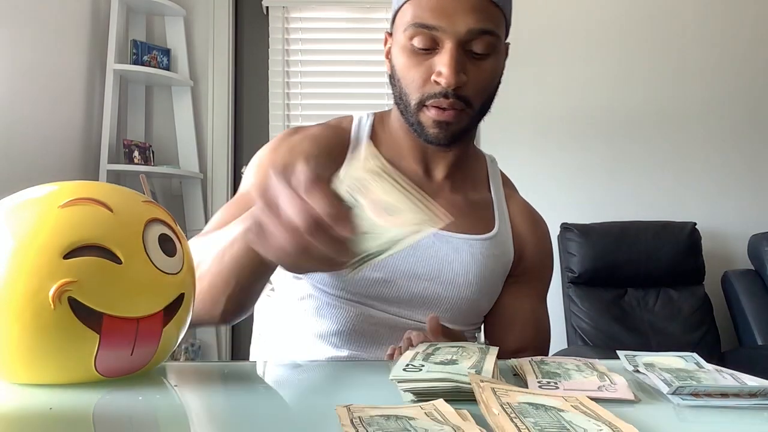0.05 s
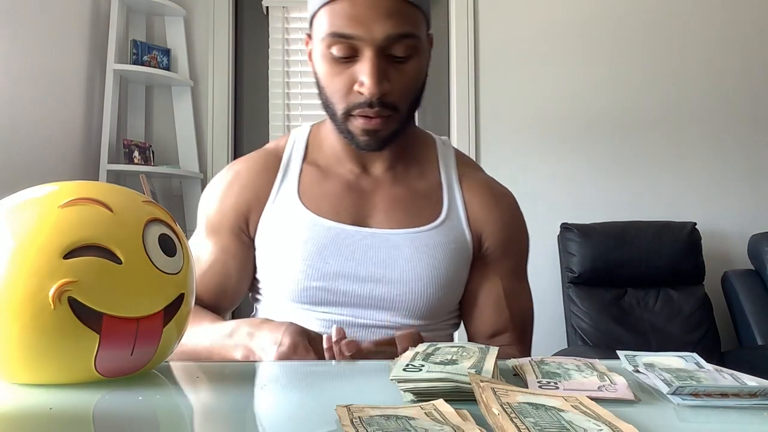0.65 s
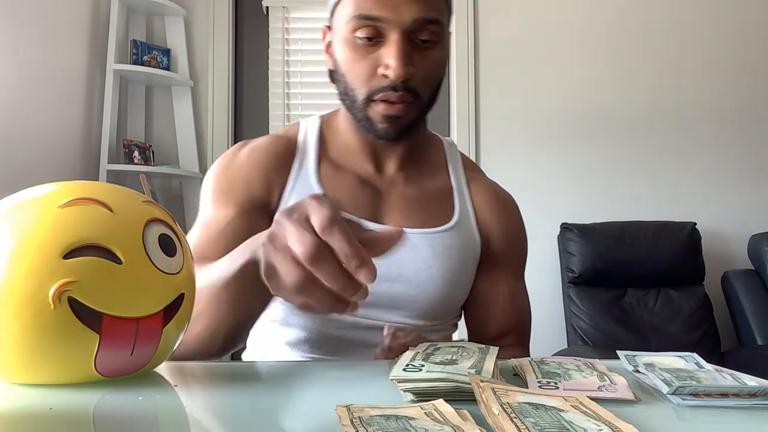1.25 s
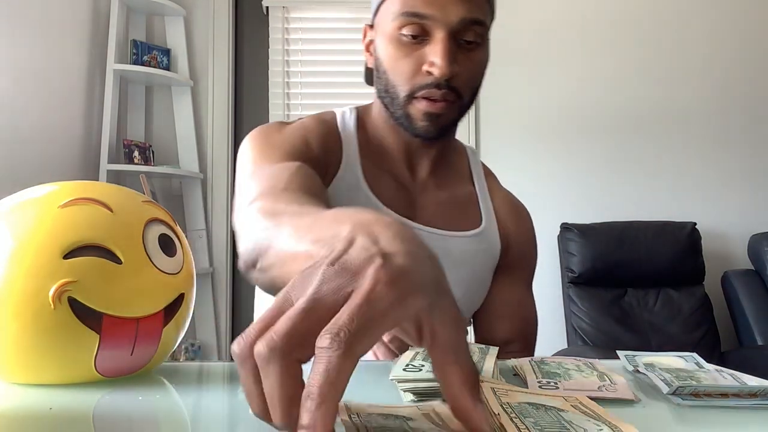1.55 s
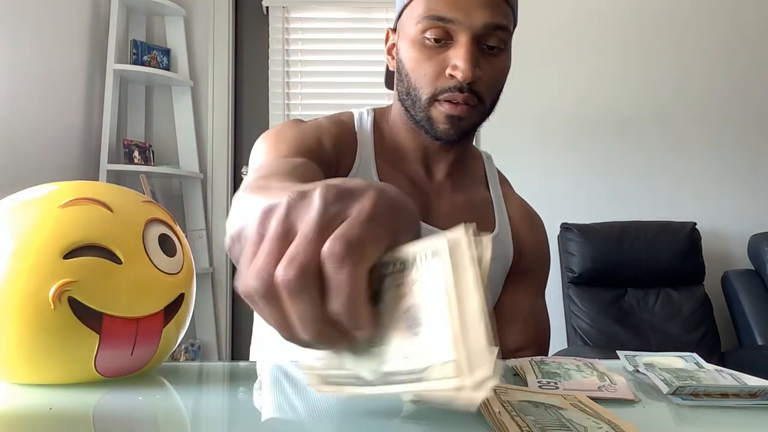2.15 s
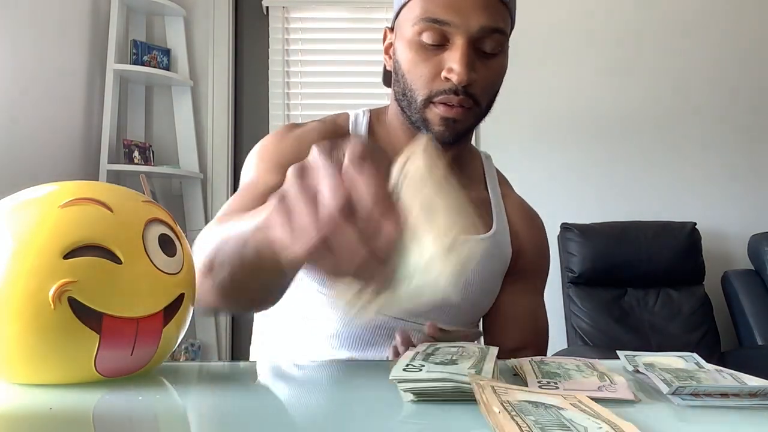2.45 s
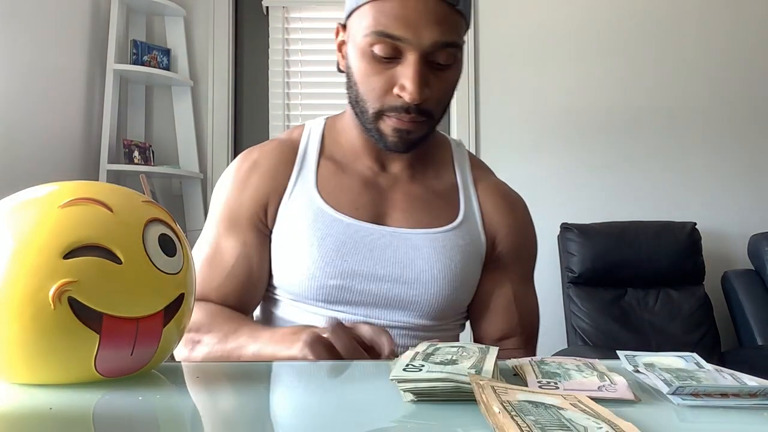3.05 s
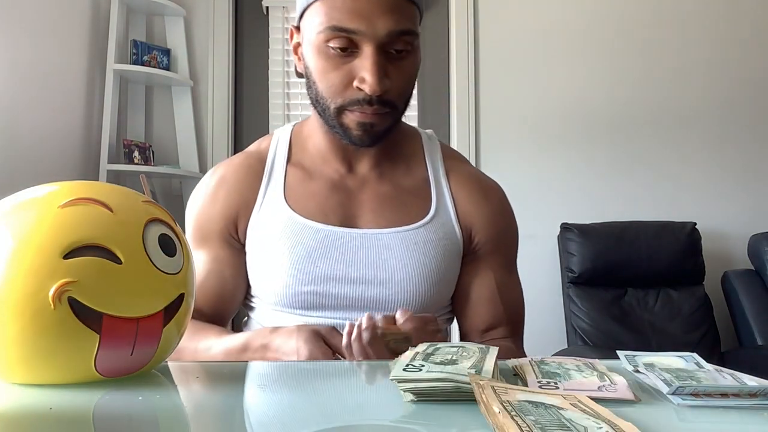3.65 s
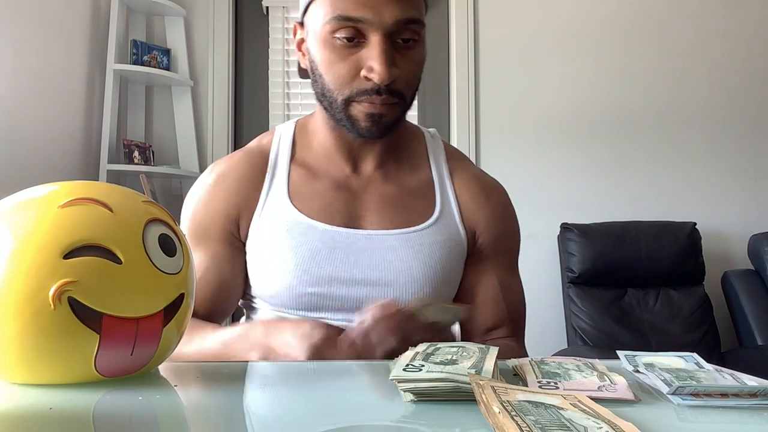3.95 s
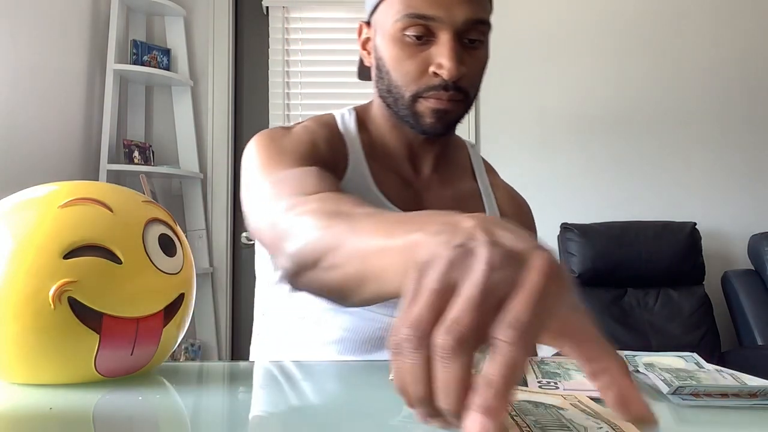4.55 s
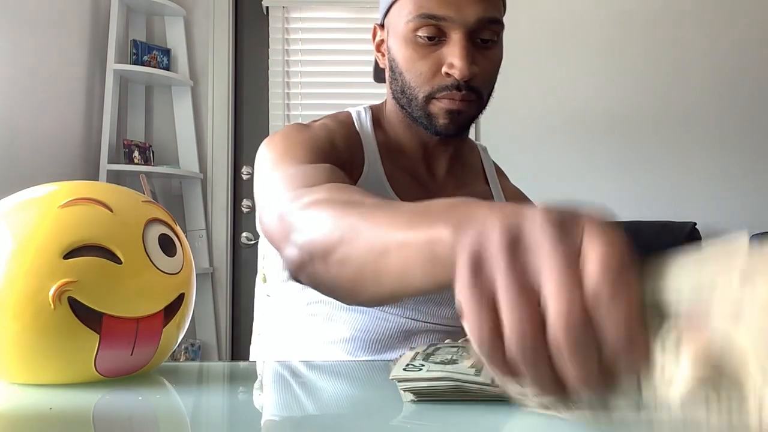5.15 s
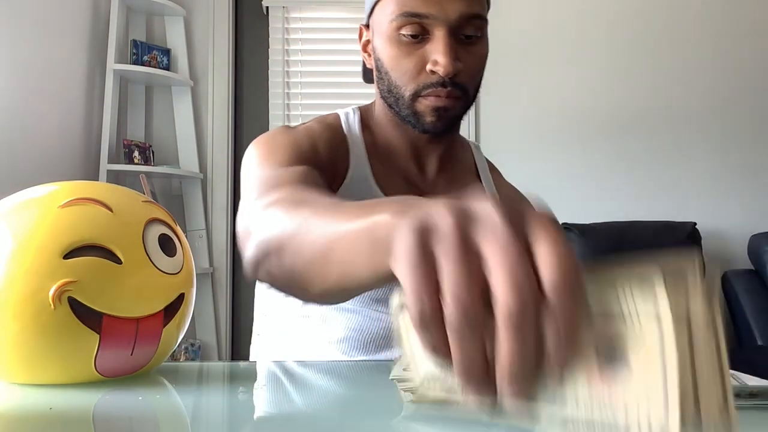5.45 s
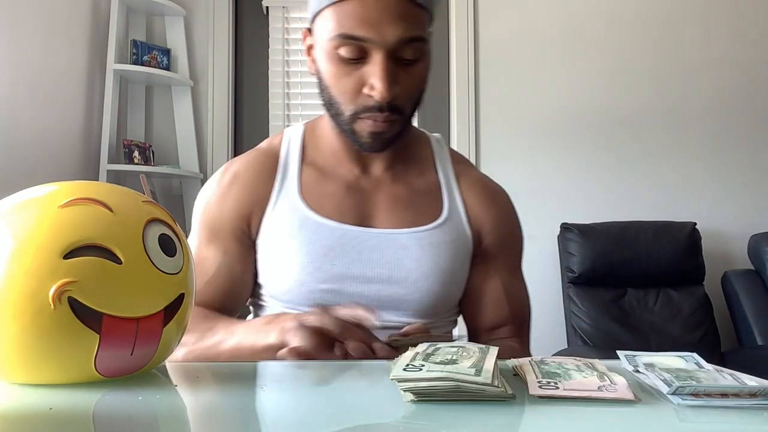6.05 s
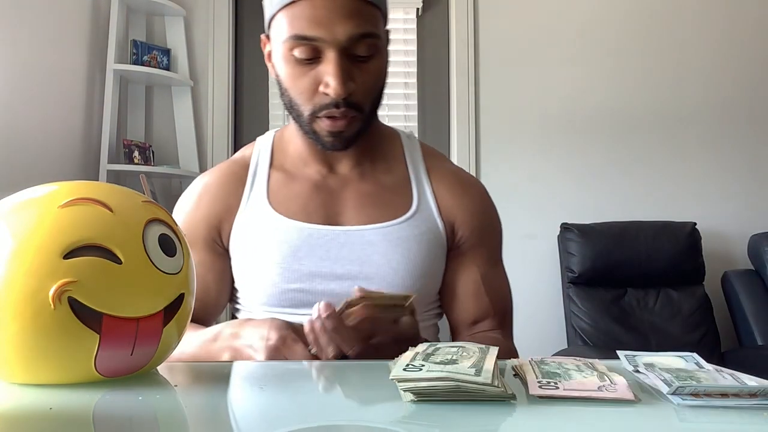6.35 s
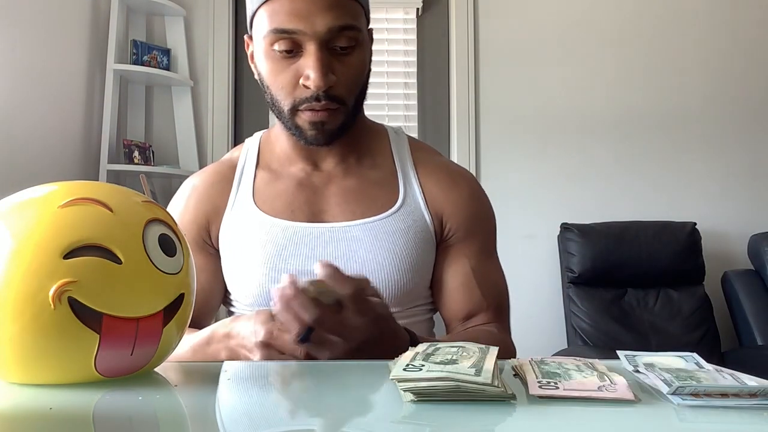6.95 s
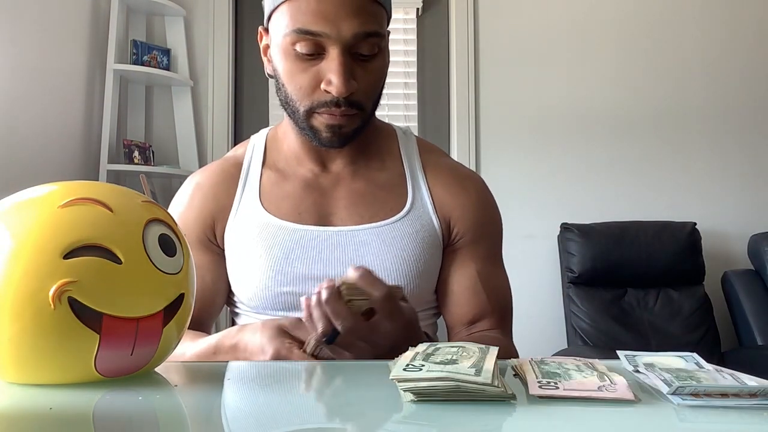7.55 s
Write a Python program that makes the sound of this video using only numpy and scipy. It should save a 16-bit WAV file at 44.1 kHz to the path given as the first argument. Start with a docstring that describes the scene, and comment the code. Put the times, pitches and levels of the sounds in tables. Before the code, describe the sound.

Fingers thump a glass table and gather paper money, with soft rustles, light ticks and two sharp knocks of the stack.

```python
"""A knock's reverberation dies away in a small, bare room, over a low ventilation hum.
Banknotes slide and tick in the hands: stick-slip friction and brief impacts of paper.
Fingers thump a glass table, launching bending waves, and scrape up the pile of bills.
Twice its edge is knocked square on the glass, and things in the room ring in sympathy."""
import sys
import numpy as np
from scipy import signal
from scipy.fft import rfft, irfft
from scipy.io import wavfile
from scipy.ndimage import uniform_filter1d

SR = 44100
rng = np.random.default_rng(int(sys.argv[2]) if len(sys.argv) > 2 else 0)


def inscribe(sig):
    """Save sig as 16-bit PCM at rate SR to the path in sys.argv[1].

    A 1-D sig is mono; a 2-D sig holds one channel per row.
    Samples are clipped to [-1, 1] before scaling.
    """
    pcm = np.round(np.clip(np.atleast_2d(sig).T, -1, 1) * 32767)
    wavfile.write(sys.argv[1], SR, pcm.astype(np.int16))


N = 343980
TAPS, TAIL = 8192, 30000  # samples in an impact and in a reverberant tail
TIME, FREQS = np.arange(N) / SR, np.fft.rfftfreq(N, 1 / SR)


def gain_of(db):
    """Amplitude grows tenfold every 20 dB."""
    return 10 ** (np.asarray(db) / 20)


def unit_rms(x):
    """Normalises mean power to 1."""
    return x / np.sqrt(np.mean(x ** 2) + 1e-20)


def unit_blow(x):
    """Normalises energy to that of one millisecond at full level."""
    return x * np.sqrt(SR / 1000 / np.sum(x ** 2))


def curve_at(points, hz):
    """Interpolates a table on a log-frequency axis."""
    f, value = np.transpose(points)
    return np.interp(np.log(hz + 1), np.log(f + 1), value)


def coloured(x, points):
    """Spectral shaping of a long sound, at rms 1."""
    return unit_rms(irfft(rfft(x) * gain_of(curve_at(points, FREQS)), N))


def add(mix, start_s, sound):
    """Superposition: a sound adds to the mix from its start time."""
    part = mix[round(start_s * SR):][:len(sound)]
    part += sound[:len(part)]


def hump(hz, octaves):
    """Minimum-phase response with one broad peak and straight skirts."""
    away = np.log2((np.fft.rfftfreq(TAPS, 1 / SR) + 10) / hz) / octaves
    log_gain = np.maximum(2 * (1 - np.sqrt(1 + away ** 2)), -10)
    phase = -signal.hilbert(np.r_[log_gain, log_gain[-2:0:-1]]).imag[:len(away)]
    return np.exp(log_gain + 1j * phase)


def ringing(modes, t):
    """Free vibration is a sum of exponentially damped modes."""
    return sum(gain_of(db - 60 * t / t60) * np.cos(2 * np.pi * hz * t) for hz, db, t60 in modes)


def ventilation(air_db=-60.5, hum_hz=58.5, hum_db=-54.5, hum_db_per_s=-2.5):
    """Broadband air noise and duct resonances lie under a motor's slowly receding hum."""
    # air noise spectrum: f/Hz, relative level/dB
    air_spectrum = [(18, -38.5), (30, -20), (49, -8), (70, -8), (88, -9), (184, -10), (303, -13),
                    (364, -11), (600, -18.5), (1320, -33), (1540, -31.5), (1760, -39), (2060, -33),
                    (2410, -35.5), (16000, -40)]
    # duct resonances: f/Hz, width/Hz, level/dB
    duct_modes = [(60.5, 6.9, -70), (181, 6.5, -67.5), (362, 57, -66.5)]
    air = gain_of(air_db) * coloured(rng.standard_normal(N), air_spectrum)
    for hz, width, db in duct_modes:
        band = rfft(rng.standard_normal(N)) / (1 + ((FREQS - hz) / width) ** 2) ** 2
        air += gain_of(db) * unit_rms(irfft(band, N))
    return air + gain_of(hum_db + hum_db_per_s * TIME) * np.sin(2 * np.pi * hum_hz * TIME)


def room(x, build_s=0.0069, wall_s=0.073, wall_db=3):
    """Reverberation: reflections build up, swell as the far walls answer, and decay band by band."""
    # reverberation time: f/Hz, T60/s
    decay_times = [(100, 0.48), (400, 0.15), (1400, 0.71), (3700, .58), (7000, .54), (10000, 0.43),
                   (15000, 0.65)]
    # colour of the reverberant field: f/Hz, gain/dB
    colour = [(100, 3.5), (400, 1), (900, -3), (2200, -5), (2900, 2), (4500, -3.5), (7000, 0),
              (10000, -2.5), (15000, -5)]
    t = np.arange(TAIL) / SR
    far_walls = gain_of(wall_db * np.exp(-((t - wall_s) / .016) ** 2))
    reflections = rng.standard_normal(TAIL) * (1 - np.exp(-t / build_s)) * far_walls
    hz, when, bands = signal.stft(reflections, SR, nperseg=256)
    t60 = curve_at(decay_times, hz)[:, None]
    bands *= gain_of(curve_at(colour, hz)[:, None] - 60 * when / t60)
    bands *= np.sqrt(2 * np.log(1000) / (t60 * SR))  # offsets the greater energy of a longer decay
    return signal.fftconvolve(x, signal.istft(bands, SR, nperseg=256)[1])[:N]


def early_echoes(x, count=14, echo_db=-12):
    """Early reflection: the table, body and nearby things add dull echoes to the direct sound."""
    delays = rng.uniform(.0005, .012, count)
    taps = np.zeros(TAPS)
    taps[(delays * SR).astype(int)] = rng.choice([-1, 1], count) * np.exp(-delays / .007)
    taps = signal.lfilter([1], [1, -.4], taps)
    return x + gain_of(echo_db) * signal.oaconvolve(x, taps / np.linalg.norm(taps))[:N]


def lingering_knock(ago_s=.28, send_db=-5):
    """Reverberant decay: at the start the room still rings from a knock a moment earlier."""
    out = np.zeros(N)
    tail = room(unit_blow(irfft(hump(hz=3000, octaves=2.5))))
    add(out, 0, gain_of(send_db) * tail[round(ago_s * SR):])
    return out


def sympathy(x, coupling_db=-6.5):
    """Sympathetic resonance: a knock drives the modes of things in the room."""
    # modes of those things: f/Hz, relative level/dB, T60/s
    modes = [(843, -57.5, 0.63), (1220, -65, 0.33), (1510, -60.5, 0.31), (1859, -57.5, 0.56),
             (2560, -60, 0.33), (2720, -58.5, 0.45), (2990, -59.5, 0.68), (3140, -56, 0.39)]
    return gain_of(coupling_db) * signal.fftconvolve(x, ringing(modes, np.arange(TAIL) / SR))[:N]


def flexing(x, depth_db):
    """Spectral modulation: as the notes bend, patches of their spectrum swell and fade."""
    bands = signal.stft(x, SR, nperseg=256)[2]
    swell = 0
    for weight, bins, frames in (1, 9, 18), (.7, 3, 8):  # broad patches, fine patches
        patches = uniform_filter1d(rng.standard_normal(bands.shape), bins, axis=0)
        swell += weight * unit_rms(uniform_filter1d(patches, frames, axis=1))
    return signal.istft(bands * gain_of(depth_db * swell), SR, nperseg=256)[1][:N]


def stroke(rise, fade, fade_db=-19.5, coasting=1.1):
    """Sliding paper speeds up smoothly, coasts a little, and is brought to rest by friction."""
    t = np.arange(0, rise + 3 * fade, 1 / SR)
    attack = np.sin(np.pi / 2 * np.minimum(t / rise, 1)) ** 2
    return attack * gain_of(fade_db * (np.maximum(t - rise, 0) / fade) ** coasting)


def rustle(strokes, slips_per_s, slip_db, clump_db, flex_db, hiss, trims_db):
    """Stick-slip friction: fibres catch and slip in clumps over a hiss; strokes set level and colour."""
    # the paper's low, middle and high bands, in the order of trims_db: f/Hz, relative level/dB
    body = [(100, -10), (350, 6), (700, -4), (2000, -5), (3200, -19), (6000, -37.5)]
    scrape = [(1200, -26.5), (2600, -2), (4200, 0), (8000, -5.5), (11500, -18.5), (16000, -34)]
    sheen = [(5000, -21.5), (9200, -6), (12000, -3.5), (14800, 3), (16500, -3.5)]
    slips = (rng.random(N) < slips_per_s / SR) * rng.choice([-1, 1], N)
    strengths = gain_of(slip_db * np.minimum(rng.exponential(1, N), 4))
    clumps = gain_of(clump_db * unit_rms(uniform_filter1d(rng.standard_normal(N), size=260)))
    friction = unit_rms(slips * strengths) + hiss * rng.standard_normal(N)
    friction = flexing(friction * clumps, flex_db)
    bands = [coloured(friction, colour) for colour in (body, scrape, sheen)]
    power = np.zeros((3, N))  # incoherent strokes add in power
    for start, rise, fade, db, body_db, sheen_db in strokes:
        for band_power, tilt_db, trim_db in zip(power, (body_db, 0, sheen_db), trims_db):
            add(band_power, start, (gain_of(db + tilt_db + trim_db) * stroke(rise, fade)) ** 2)
    return (np.sqrt(power) * bands).sum(0)


def notes_in_hands():
    """Sliding friction of paper on paper: dense, small slips merge into a smooth rustle."""
    # strokes before band trims: t/s, rise/s, fade/s, level/dB, body/dB re level, sheen/dB re level
    strokes = [(.33, 0.013, 0.11, -58, -1, 4), (.54, 0.072, 0.31, -71, 2.5, 3),
               (.785, 0.027, .05, -68.5, -3, 9.5), (.81, 0.067, 0.17, -62.5, 1, 9.5),
               (1.01, 0.055, 0.12, -57.5, 0.5, 0.5), (2.66, .04, .08, -66, -8.5, -12),
               (2.79, 0.016, .14, -67, 3.5, -8), (2.89, 0.09, 0.17, -60, -4.5, -1),
               (3.24, 0.055, 0.26, -74.5, 0.5, 3), (3.49, .035, 0.11, -69.5, 3.5, 5),
               (3.54, 0.027, 0.065, -61.5, -8, -9), (3.63, 0.058, 0.19, -69, -2.5, -5),
               (3.912, .01, 0.11, -61, -4, -3), (3.97, .075, .09, -66, -6.5, 6.5),
               (5.875, 0.021, 0.21, -58, -0.5, 1), (5.96, 0.06, 0.1, -65.5, -2, 7),
               (6.18, 0.14, .22, -66, -2, 3), (6.32, .07, .12, -71, -12, 12.5),
               (6.42, 0.039, .07, -66, 1, 9), (6.45, 0.083, 0.12, -55.5, -7.5, 7),
               (6.71, 0.043, 0.15, -61, -3, 2.5), (6.85, 0.047, .12, -60, -2.5, 1.5),
               (6.92, 0.055, 0.16, -54, -2, 1), (7.05, 0.067, 0.15, -49, -5, -0.5),
               (7.33, 0.031, 0.17, -48.5, -11.5, 0.5), (7.53, 0.056, 0.48, -71, 1, 1),
               (7.71, 0.018, .12, -68, 0.5, 2)]
    return rustle(strokes, slips_per_s=3000, slip_db=1.5, clump_db=1.4, flex_db=1.5, hiss=0.93,
                  trims_db=(1.5, -3, -3))


def pile_on_glass():
    """Sliding friction of paper on glass: sparser, clumped slips make a rough scrape."""
    # strokes before band trims: t/s, rise/s, fade/s, level/dB, body/dB re level, sheen/dB re level
    strokes = [(1.635, 0.069, 0.28, -57.5, -3, 4.5), (1.75, 0.073, 0.057, -54.5, -7.5, 4),
               (1.935, .05, .125, -52.5, -4, 5.5), (2.085, .03, 0.09, -65.5, -12, 6.5),
               (2.14, 0.024, 0.049, -62, -13.5, -5), (4.582, 0.021, .3, -54, -8.5, -3.5),
               (4.757, .01, 0.098, -39.5, -9, 2), (4.785, .012, .06, -54, -10.5, 9.5),
               (4.815, .033, 0.042, -40.5, -7.5, -0.5), (4.87, .06, 0.11, -44, -2, 3),
               (4.98, 0.047, .14, -51, -5, -1.5), (5.05, 0.03, .12, -47, -10.5, 1.5),
               (5.16, 0.043, 0.056, -54.5, -13.5, 2.5), (5.278, 0.054, .025, -53.5, -4.5, 7)]
    return rustle(strokes, slips_per_s=1500, slip_db=1.6, clump_db=3, flex_db=3.5, hiss=.55,
                  trims_db=(2.5, -4, -2))


def cracks(contacts, crumple, room_db):
    """Impulsive excitation: a sharp contact and a flurry of tiny ones; the room gets the mean spectrum."""
    out, t = np.zeros(N), np.arange(TAPS) / SR
    for start, db, hz, octaves, decay in contacts:
        flurry = rng.standard_normal(TAPS) * np.exp(-t / decay) * crumple
        flurry[0] += 1
        colour = hump(hz, octaves)
        add(out, start, gain_of(db) * unit_blow(irfft(rfft(flurry) * colour)))
        add(out, start, gain_of(db + room_db) * room(unit_blow(irfft(colour))))
    return out


def note_ticks():
    """Single notes snap and flick, radiating short transients."""
    # snaps: t/s, level/dB, centre f/Hz, spread/octaves, decay/s
    snaps = [(.337, -43.5, 1500, 1.3, 0.0019), (1.093, -43.5, 14300, 0.34, .001),
             (1.0935, -46, 2800, 0.93, .001), (1.7325, -40.5, 6000, 2, .0014),
             (1.784, -35.5, 6500, 2.3, .0025), (1.83, -38.5, 7000, 1.8, .0024),
             (1.9844, -38.5, 6000, 1.8, 0.0036), (4.734, -37.5, 4870, 1.6, .002),
             (4.7532, -32, 9000, 2.3, 0.0016), (4.8243, -33.5, 3800, 0.19, .002),
             (4.841, -27.5, 4400, .49, 0.011), (4.9043, -25.5, 2050, 1.1, 0.001),
             (4.917, -29, 1420, 1.1, 0.00048), (4.9352, -24, 2930, 1.3, 0.0012),
             (4.964, -31.5, 9000, 1.8, .001), (5.0137, -34, 5010, 1.32, 0.0019),
             (5.28, -45.5, 9000, 2.2, .0015), (6.873, -45, 1400, 0.51, 0.0014),
             (7.1176, -34.5, 1500, 1.4, .0025), (7.131, -38, 900, 1.5, 0.0027),
             (7.2254, -43, 1300, .5, 0.00084), (7.317, -42.5, 2800, 1.3, 0.013),
             (7.3443, -28.5, 1250, 1.75, 0.0012), (7.3452, -31, 4300, 0.21, .0008),
             (7.4508, -42.5, 4500, 0.62, 0.0014), (7.6421, -49.5, 1300, 1.16, 0.0038),
             (7.7322, -37, 514, 0.43, 0.00093)]
    return cracks(snaps, crumple=0.63, room_db=-13)


def glass_thumps(lag=0.091, ring_db=-50, click_ring_db=-58, edge_db=-11, edge_s=0.018, echo_count=6):
    """Dispersion: bending waves cross the glass treble first, echo off its edges and excite its modes."""
    # fingers and pile strike the table: t/s, thud level/dB, centre f/Hz, click level/dB
    blows = [(1.413, -30.5, 308, -44.5), (1.4328, -25, 312, -39.5), (1.45, -18, 255, -33),
             (1.5179, -26, 264, -37.5), (1.538, -22.5, 244, -26.5), (1.908, -31.5, 215, -54.5),
             (2.209, -16.5, 360, -31.5), (2.236, -23, 240, -20), (4.434, -29.5, 320, -46.5),
             (4.546, -20.5, 187, -29), (4.6231, -30.5, 272, -40.5), (4.905, -35.5, 269, -44.5),
             (4.935, -32.5, 271, -45.5), (5.336, -18, 328, -19), (5.343, -32.5, 100, -22)]
    # modes of the glass top: f/Hz, relative level/dB, T60/s
    modes = [(96, -1.5, .09), (164, 1.5, 0.12), (226, -1.5, .12), (336, -5.5, 0.12), (403, -6.5, 0.075),
             (597, -4.5, .2), (840, 0, 0.18), (1130, 5.5, 0.024), (1210, 8.5, 0.016), (1780, 9, .045),
             (2200, 10.5, 0.044), (2710, 2.5, .025)]
    out, t, f = np.zeros(N), np.arange(TAPS) / SR, np.fft.rfftfreq(TAPS, 1 / SR)
    travel = np.exp(-4j * np.pi * lag * np.sqrt(f))  # group delay is lag / sqrt(f)
    glass = rfft(ringing(modes, t))
    for start, db, hz, click_db in blows:
        octaves = 1.3 * np.exp(.03 * (click_db - db))  # harder contacts spread wider
        delays, turns = rng.random((2, echo_count, 1))
        echoes = np.exp(-delays - 2j * np.pi * (turns + f * (0.0017 + edge_s * delays))).sum(0)
        echoes *= gain_of(edge_db) * (1 + f / (f + 600))  # short waves scatter the most
        waves = hump(hz, octaves) * travel * (1 + echoes)
        thud = irfft(waves * (1 + gain_of(ring_db) * glass)) * np.exp(-t / 0.033)
        contact = rfft(rng.standard_normal(TAPS) * np.exp(-t / 0.0073))
        click = irfft(contact * hump(hz=1000, octaves=2 * octaves) * (1 + gain_of(click_ring_db) * glass))
        add(out, start, gain_of(db) * unit_blow(thud) + gain_of(click_db) * unit_blow(click))
    return out


def edge_knocks():
    """Brief impacts have broad spectra: the pile's edge hits the glass, a clump of notes at a time."""
    # impacts: t/s, level/dB, centre f/Hz, spread/octaves, decay/s
    impacts = [(2.2075, -37.5, 2544, 1.6, 0.0033), (2.2099, -24, 6500, 0.88, 0.0014),
               (2.2123, -15, 13000, .8, 0.0006), (2.2128, -11.5, 2170, 2.15, 0.0062),
               (2.2242, -6, 5290, .9, .00025), (2.2246, -13, 1350, 1.42, .0012),
               (2.2415, -21, 2200, 1.8, 0.0033), (5.3257, -18.5, 7940, 1.8, .0006),
               (5.3275, -15.5, 14000, 0.86, 0.0013), (5.3311, -17.5, 1550, 1, 0.0026),
               (5.3367, -17, 3000, 1.8, 0.00046), (5.3379, -9.5, 4600, 0.54, 0.0016),
               (5.3381, -7.5, 10900, 1.2, 0.00084), (5.3401, -7.5, 4210, 1.4, 0.0019),
               (5.3421, -11.5, 1450, 1.25, 0.009)]
    return cracks(impacts, crumple=0.49, room_db=-8)


def scene():
    """Direct sound, early echoes, resonance and reverberation superpose over the ventilation."""
    knocks = edge_knocks()
    ticks = note_ticks()
    thumps = glass_thumps()
    scrapes = pile_on_glass()
    slides = notes_in_hands()
    close = early_echoes(knocks + ticks + thumps + scrapes + slides)
    reverb = room(gain_of(-5) * thumps + gain_of(-8.5) * scrapes + gain_of(-9.5) * slides)
    return (close + sympathy(knocks) + reverb + lingering_knock() + ventilation())[None]


def record(dry, low_hz=42, high_hz=16100):
    """Band limiting: a high-pass drops the deepest bass, peaks clip at full scale, a low-pass follows."""
    lean = irfft(rfft(dry) / np.sqrt(1 + (low_hz / (FREQS + 1)) ** 12), N)
    low_pass = signal.firwin(401, high_hz, window=("kaiser", 8), fs=SR)
    return signal.oaconvolve(np.clip(lean, -1, 1), low_pass[None], "same")


dry = scene()
out = record(dry)
inscribe(out)
```